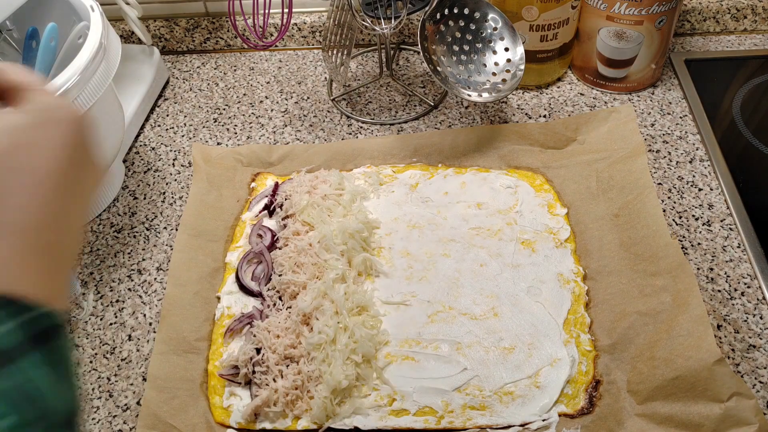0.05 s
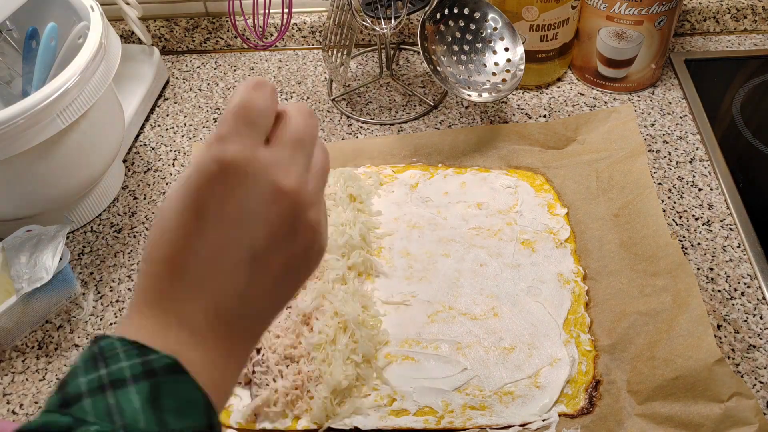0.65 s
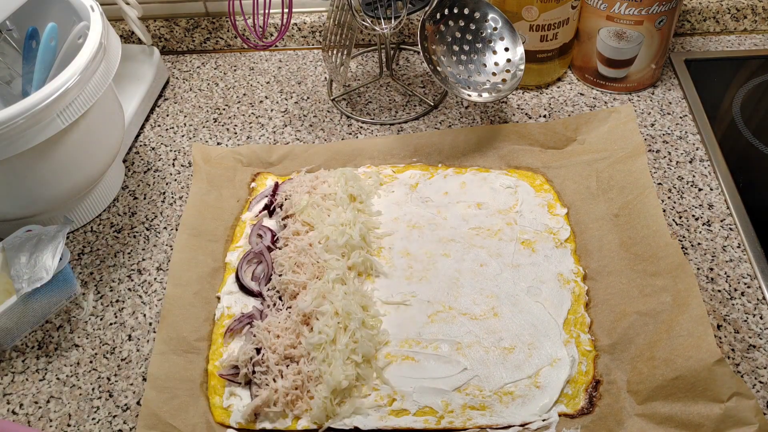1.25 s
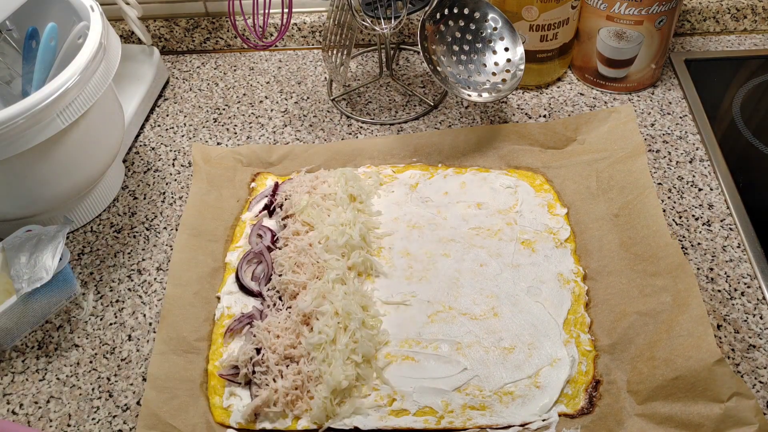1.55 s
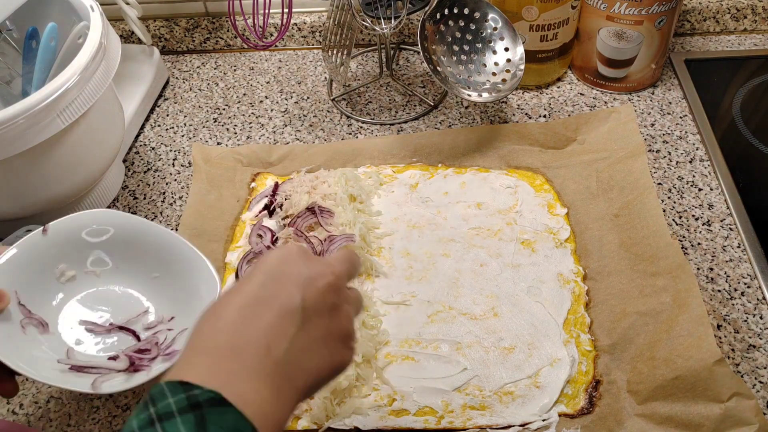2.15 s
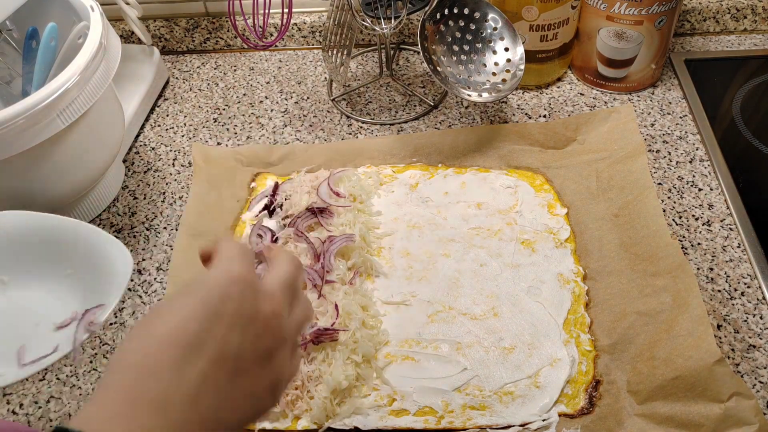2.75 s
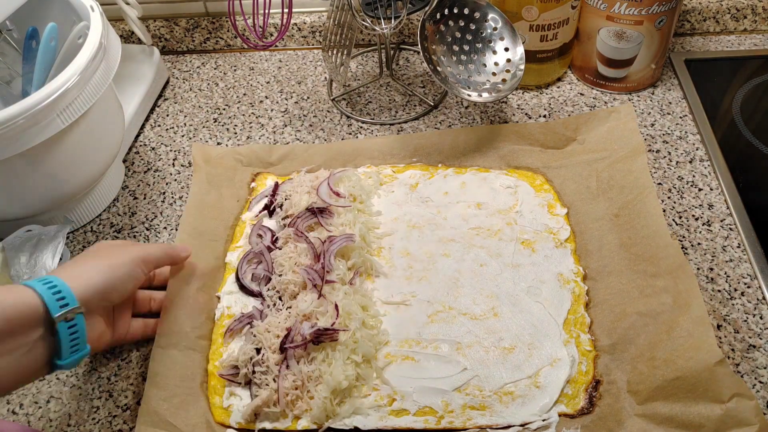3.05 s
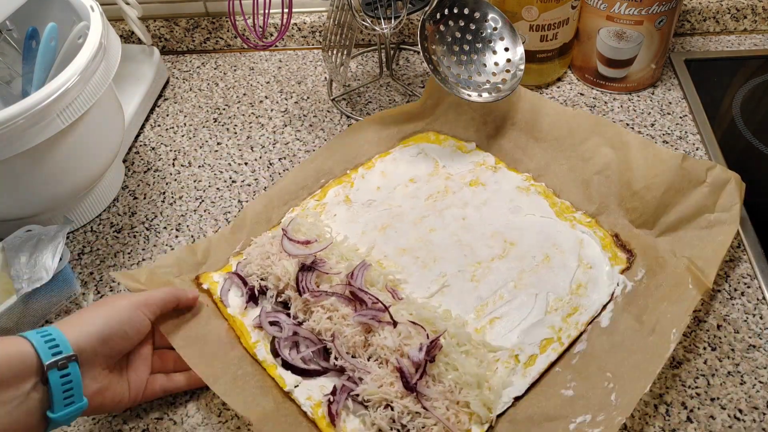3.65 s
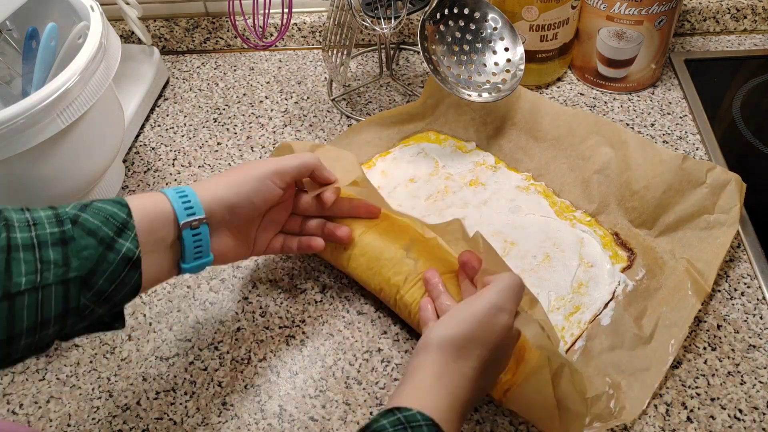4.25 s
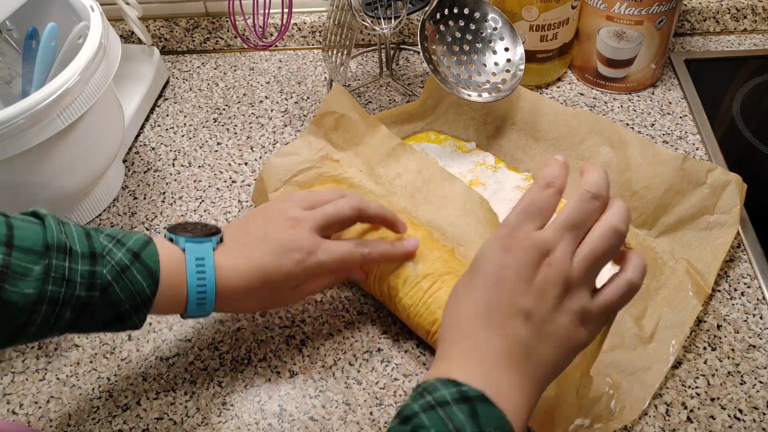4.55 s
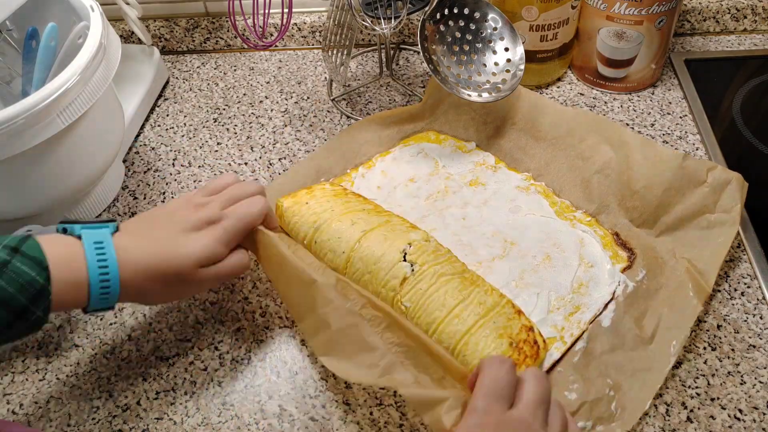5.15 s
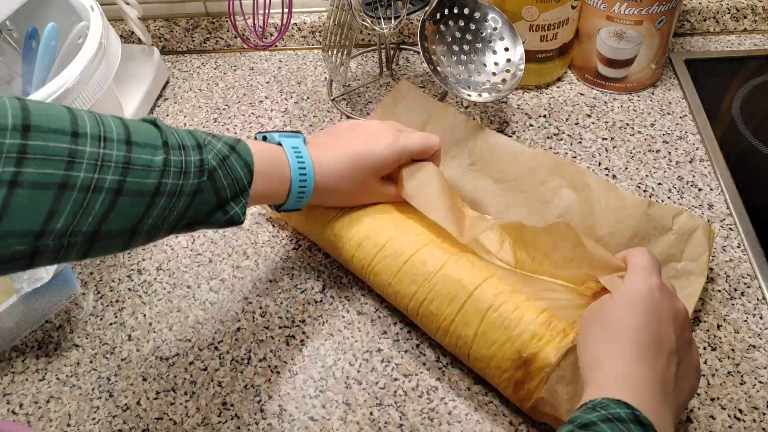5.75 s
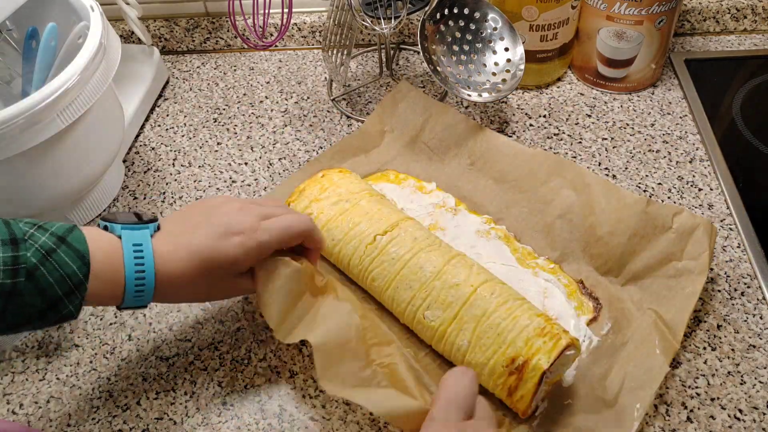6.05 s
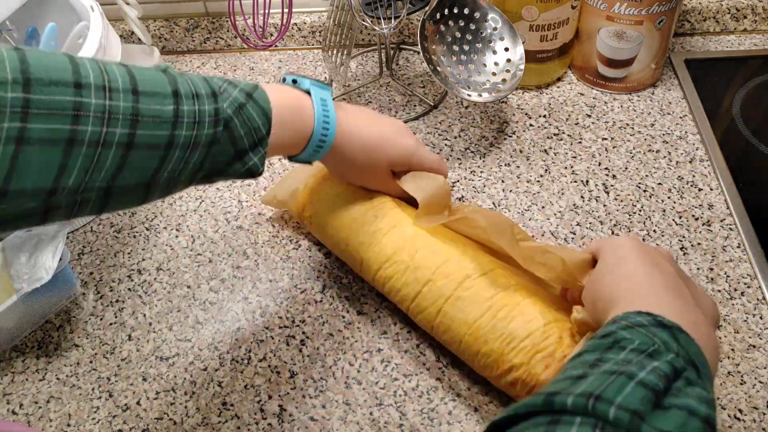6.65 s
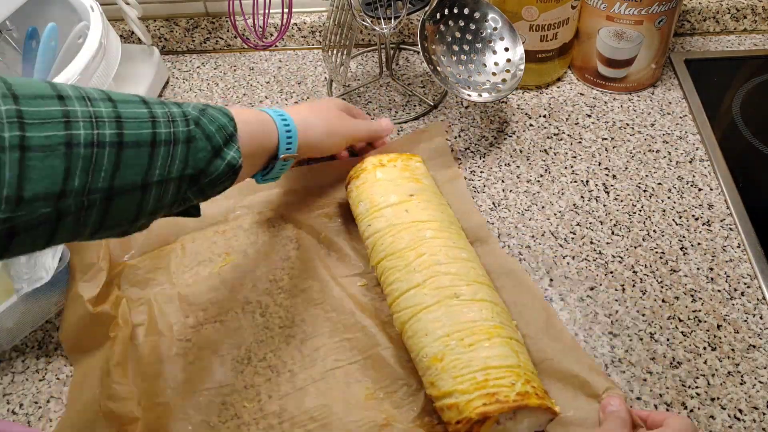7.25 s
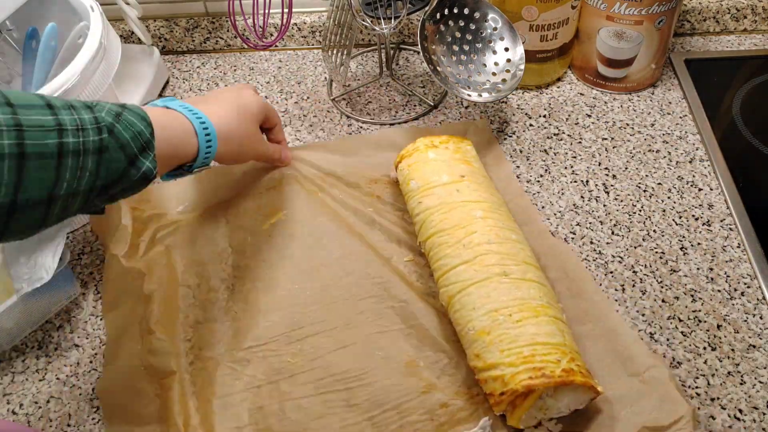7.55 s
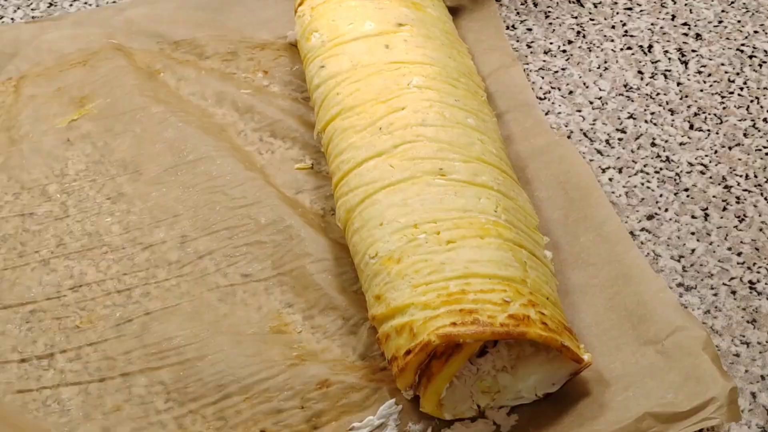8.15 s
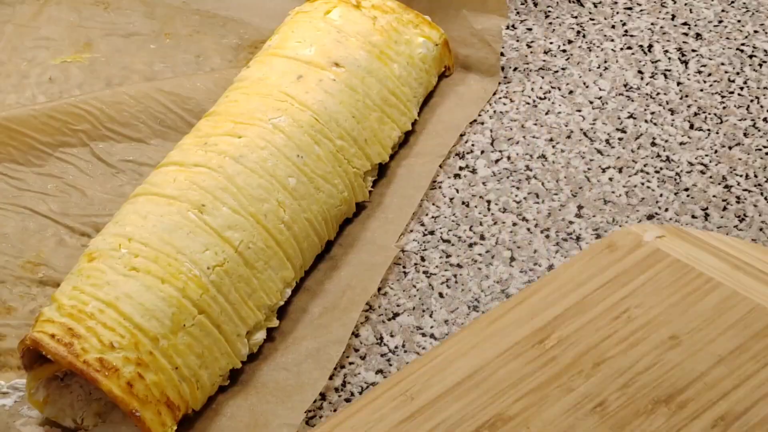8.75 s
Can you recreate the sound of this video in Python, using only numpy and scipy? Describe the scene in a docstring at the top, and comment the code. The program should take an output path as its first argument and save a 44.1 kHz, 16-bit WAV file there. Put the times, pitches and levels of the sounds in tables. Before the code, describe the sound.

After faint ticks and a bowl's dull knock, baking paper rustles and crackles close by, ending in a short rattle of microphone handling.

```python
"""A small, hard kitchen, with a fridge humming under everything. Fingers scatter onion rings from a
china bowl with faint ticks, and the bowl is set down with a dull knock on the counter. A filled sponge
sheet is rolled up in baking paper close to a phone on a stand: the paper slides and crinkles with each
move of the hands, and its creases buckle and snap. The level dips briefly; at last the phone is lifted
and its holder booms and rattles."""
import sys
import numpy as np
from scipy import signal
from scipy.fft import rfft, irfft, next_fast_len
from scipy.io import wavfile
from scipy.ndimage import map_coordinates

SR = 44100
rng = np.random.default_rng(int(sys.argv[2]) if len(sys.argv) > 2 else 0)


def store_wav(level_fs):
    """Save 16-bit WAV to argv[1]."""
    pcm = np.round(np.clip(np.atleast_2d(level_fs), -1, 1) * 32767)
    wavfile.write(sys.argv[1], SR, pcm.T.astype(np.int16))


N = 387638

# Levels are relative within a layer; each layer's own trim comes on top.
# fader moves of the room tone: t/s, hum/dB, motor drone/dB, air/dB
ROOM_FADERS = [(0, -57.5, -71, -67), (1.1, -56.5, -68.5, -66), (1.7, -61, -65, -66), (2.8, -58.5, -63, -63),
               (4.1, -59, -63.5, -61), (5.5, -54.5, -58, -62), (6.7, -56.5, -58, -61),
               (7.85, -53, -59, -61.5), (8.15, -58.5, -66, -64), (8.79, -57, -63, -59)]
# thin tones of the fridge: f/Hz, level/dB
FRIDGE_WHINE = [(522, -79.5), (694, -80.5), (937, -84), (1771, -87), (2929, -94.5)]
# EQ of the motor's burr: f/Hz, level/dB
BURR_EQ = [(20, -17.5), (48, -6), (82, -13.0), (97, -2), (112, -11.0), (150, -24), (500, -58),
           (2000, -100)]
# EQ of the room's air, also used for the hand's rub: f/Hz, level/dB
AIR_EQ = [(130, -11), (240, -10.5), (305, -1), (360, -11), (490, -11.5), (720, -12.5), (1000, -22.5),
          (1300, -24.5), (1750, -23), (2500, -30.5), (3000, -29.5), (4000, -36), (7000, -46),
          (13000, -46.5), (16000, -49.5)]
# stereo width of the air: f/Hz, side over mid/dB
AIR_WIDTH = [(100, -15.5), (500, -8.5), (1000, 1), (4000, 0.5)]
# fingers scatter onion rings: t/s, level/dB, length/s, bowl ring/dB, hardness/(dB per octave)
ONION_TOUCHES = [(1.005, -60.5, 0.018, 0, -11), (1.323, -55, .005, 3.5, 3.5), (1.42, -54, 0.0098, -1, -3),
                 (1.477, -55.5, 0.0076, -24, 2), (1.634, -70.5, .01, 1, 10), (1.793, -74, 0.0054, -3, 8),
                 (2.334, -76, .004, -20, 0), (2.586, -70.5, 0.015, 6.5, -5), (2.751, -68, 0.0044, -24, 0),
                 (2.802, -65, 0.0044, -20, 0)]
# EQ of the onion ticks: f/Hz, level/dB
ONION_EQ = [(800, -30), (2500, 1.5), (5500, 5), (9000, -5), (15000, -15)]
# modes of the china bowl: f/Hz, level/dB, t60/s
BOWL_MODES = [(1714, -4.5, .13), (2680, -2.5, 0.12), (3050, 0, .06), (5500, -11, 0.046), (6300, -3, 0.045),
              (7600, -18, 0.044)]
# blows on the counter: peak t/s, level/dB, rise/s, t60/s, thud f/Hz, thud/dB, scrape/dB, holder boom/dB
COUNTER_HITS = [(1.325, -49, 0.0021, 0.095, 131, 9, -0.5, -10),
                (1.428, -39.5, 0.0083, 0.065, 199.7, -7, 1.5, 2),
                (1.474, -58, 0.0094, 0.048, 192, -8, 5, 9),
                (3.027, -19.5, 0.003, 0.059, 99.2, -0.5, -8, -10),
                (3.126, -42.5, 0.011, 0.067, 101, -13, -10, -10.5)]
# modes of the worktop: f/Hz, level/dB
COUNTER_MODES = [(208, -2.5), (275, -8.5), (433, -0.5), (564, 0), (639, -7.5), (790, -4.5)]
# EQ of a scrape on the worktop: f/Hz, level/dB
SCRAPE_EQ = [(200, -11), (350, -1), (550, -0.5), (750, -7.5), (1000, 3), (1400, 1.5), (2300, -2.5),
             (4000, -13), (7000, -23.5), (15000, -46)]
# bumps that reach the phone's holder: t/s, level/dB, length/s, rattle/dB, thud/dB
HOLDER_BUMPS = [(1.988, -42, 0.012, -35, -22), (2.106, -39, 0.012, -35, -19),
                (2.469, -67.5, 0.033, -16, 19.5), (6.935, -61, 0.012, -10, 18),
                (7.056, -64.5, 0.023, -20, 14), (8.395, -47, 0.0065, -2.5, 5.5),
                (8.438, -40, 0.0024, -10, 7.5), (8.513, -30.5, 0.0031, -4.5, 0.5),
                (8.555, -27.5, 0.006, -7, -6), (8.618, -31, 0.018, -33, -9), (8.641, -29, 0.004, 5.5, -14),
                (8.653, -27.5, 0.0092, 5.5, -9), (8.7, -39.5, 0.027, -10, -24)]
# the hand gripping the holder: t/s, level/dB
GRIP_FADER = [(8.36, -68), (8.38, -50), (8.448, -40.5), (8.474, -73), (8.504, -36.5), (8.654, -27),
              (8.76, -38), (8.79, -35)]
# body resonances of the holder: f/Hz, width/Hz, level/dB
HOLDER_MODES = [(200, 60, -16), (309.5, 25, 1.5), (346.4, 32, -13.5)]
# resonances of its rattle: f/Hz, width/Hz, level/dB
RATTLE_MODES = [(200, 53, -2), (441, 37, 4.5), (577, 41, -4), (770, 96, -1.5), (982, 32, -2),
                (1150, 50, -6), (1310, 41, -6), (1444, 35, -1.5), (1870, 190, -8.5), (2920, 730, -16)]
# hands bend or drag the paper: full-speed t/s, crinkle/dB, rise/s, hold/s, fall/s, flex over crinkle/dB
PAPER_STROKES = [(2.958, -52, 0.017, 0.006, 0.021, -6), (3.021, -31.0, 0.005, 0.038, 0.023, -4.5),
                 (3.139, -35, 0.038, 0.013, 0.018, 0), (3.211, -27.5, 0.0082, 0.012, 0.059, -5),
                 (3.399, -43.5, 0.02, 0.014, 0.049, -11), (3.492, -33.5, 0.076, 0.036, 0.11, -3),
                 (3.684, -51, 0.081, 0.046, 0.049, -8), (3.749, -33, 0.048, 0.005, 0.027, -7),
                 (3.826, -33, 0.074, 0.025, 0.033, -3.5), (3.89, -27.5, 0.034, 0.035, 0.11, -3.5),
                 (4.068, -33, 0.024, 0.022, 0.035, -7), (4.12, -35.5, 0.019, 0.012, 0.02, -8.5),
                 (4.156, -33, 0.02, 0.069, 0.014, -8), (4.258, -33, 0.014, 0.037, 0.011, -10.5),
                 (4.331, -39.5, 0.016, 0.011, 0.026, -2.5), (4.453, -47, 0.089, 0.012, 0.13, -3.5),
                 (4.595, -37, 0.008, 0.025, 0.043, -5.5), (4.653, -33.5, 0.017, 0.074, 0.064, -6.5),
                 (4.811, -37, 0.0065, 0.014, 0.016, -7), (4.888, -69, 0.17, 0.057, 0.06, 9),
                 (5.02, -39.5, 0.024, 0.063, 0.03, -5.5), (5.091, -29.5, 0.026, 0.025, 0.044, -4.5),
                 (5.161, -28, 0.031, 0.041, 0.051, -5), (5.288, -45.5, 0.019, 0.054, 0.12, -4),
                 (5.563, -42.5, 0.05, 0.061, 0.018, 2.5), (5.65, -36.0, 0.016, 0.011, 0.023, -5.5),
                 (5.754, -40.5, 0.087, 0.019, 0.096, -1), (5.84, -37, 0.019, 0.012, 0.024, -6),
                 (5.896, -32.0, 0.033, 0.04, 0.048, -7), (5.971, -40.5, 0.018, 0.037, 0.018, -6),
                 (6.043, -40.5, 0.012, 0.023, 0.03, -8), (6.115, -43.5, 0.087, 0.066, 0.1, -2),
                 (6.426, -45.5, 0.047, 0.04, 0.025, -4), (6.503, -54.5, 0.01, 0.024, 0.02, 3),
                 (6.538, -32.5, 0.0087, 0.171, 0.034, -7.5), (6.764, -36.5, 0.041, 0.021, 0.014, -6.5),
                 (6.809, -38.5, 0.019, 0.04, 0.021, -6.5), (6.881, -43.5, 0.017, 0.006, 0.02, -4),
                 (6.931, -36.5, 0.073, 0.015, 0.043, -10), (7.018, -32.5, 0.061, 0.014, 0.09, -8.5),
                 (7.183, -31, 0.012, 0.038, 0.035, -6), (7.276, -36, 0.019, 0.0074, 0.015, -30),
                 (7.316, -38, 0.0095, 0.025, 0.024, -5.5), (7.384, -36.5, 0.065, 0.054, 0.016, -11.5),
                 (7.522, -29.5, 0.013, 0.016, 0.071, -10.5), (7.587, -43, 0.02, 0.0049, 0.012, -4),
                 (7.641, -55, 0.03, 0.015, 0.018, -20), (7.695, -50, 0.013, 0.0071, 0.014, -35),
                 (8.368, -36.5, 0.017, 0.0067, 0.028, -3.5), (8.407, -33.5, 0.018, 0.018, 0.076, -8),
                 (8.48, -40.5, 0.062, 0.177, 0.012, -8), (8.695, -41.0, 0.01, 0.0044, 0.046, -8),
                 (8.782, -34, 0.019, 0.0096, 0.03, -4.5)]
# bright EQ of the small creases: f/Hz, level/dB
CRINKLE_EQ = [(600, -35.5), (1500, -15.5), (3000, -0.5), (4200, 1), (6000, 1.5), (8500, 0), (10000, -3),
              (12500, -3), (14500, -11), (16000, -21.5)]
# darker EQ of the broad sheet flexing: f/Hz, level/dB
FLEX_EQ = [(100, -22), (300, -12), (600, -14), (1100, -5), (1800, 1.5), (2800, 1), (4500, -2),
           (9000, -26.5)]
# creases that buckle: t/s, level/dB, low-mid share/dB, paper facet f/Hz, left over right/dB
CREASE_SNAPS = [(3.02, -9.5, -1, 1840, -4), (3.2095, -26.5, -5, 3200.0, -1), (3.2975, -23, -11, 8500, 5),
                (3.481, -28, 9.5, 2320, 2), (3.517, -15, 1.5, 2820, -1), (3.5714, -20.5, -9.5, 6400.0, 1),
                (3.679, -31, -11, 5100.0, 5), (3.7471, -13, -2.5, 2320, -4), (3.8423, -10.0, -6, 2320, -2),
                (3.8902, -7.5, -3.5, 8350, -1), (3.917, -11, -6, 7400.0, 4),
                (3.9714, -13.0, -9.5, 7800.0, -3), (4.074, -14, -5, 8400, -2),
                (4.1138, -14.5, -4, 7800.0, 1), (4.2524, -20, -10, 5100.0, 1),
                (4.685, -15.5, 4, 10100.0, -1), (5.091, -16.5, 5.5, 1810, 2), (5.1425, -12, 0.5, 5100.0, 2),
                (5.3968, -28.5, 0.5, 3200.0, -1), (5.476, -14, -9.5, 8800, 7),
                (5.485, -20.5, -9, 8400, 1.5), (5.5617, -10, -8.5, 5800, -1.5), (5.6065, -19, 0, 1760, 0),
                (5.651, -19.5, -4, 7400.0, 4), (5.7674, -13.5, -0.5, 9300, 0.5),
                (5.9338, -22.5, -1, 3700.0, 1), (6.0476, -19, -20, 5250, 2), (6.1674, -28, -1, 1800.0, 0),
                (6.5371, -15.5, -2, 4140, 2.5), (6.6505, -19, -6, 8300.0, -0.5),
                (6.6914, -15.5, -5, 8850, -1), (6.7436, -25, -11, 8300.0, -5.5),
                (6.7673, -15, -1, 6000.0, 0), (6.9276, -22.0, -8, 5500.0, -2),
                (7.0191, -14, -9.5, 7460, 3.5), (7.1885, -10.5, -8.5, 8400, 3),
                (7.25, -22, -11, 5100.0, -3), (7.3267, -15.5, -5, 4600.0, 2),
                (7.4008, -18.5, -7, 7400.0, -6), (7.428, -19, -12, 8300.0, 3),
                (7.5043, -26.0, -0.5, 5100.0, 3.5), (7.5262, -15, -10, 4600.0, 3),
                (7.5457, -15.5, -13, 5100.0, 0), (8.3674, -26.5, 1, 2820, -2),
                (8.392, -18, -10, 8300.0, 10), (8.4166, -15, -9, 4100.0, 2), (8.61, -16.5, -3, 4970, 5)]
# hands press the soft roll through the paper: t/s, level/dB, length/s
ROLL_PRESSES = [(3.1, -44.5, 0.012), (3.92, -48, 0.033), (4.69, -61, 0.032), (5.115, -46.5, 0.013),
                (5.65, -49, 0.0075), (5.74, -53, 0.044), (5.86, -49.5, 0.014), (6.59, -52, 0.036),
                (6.68, -46.5, 0.021), (6.82, -52, 0.022), (7.213, -47.5, 0.0055)]
# muffled EQ of those presses: f/Hz, level/dB
SQUASH_EQ = [(100, -21.5), (220, -10.5), (450, -2.5), (650, 1.5), (900, -5.5), (1600, -14), (5000, -60.5)]
# decay of the kitchen: f/Hz, t60/s
REVERB_DECAY = [(200, 0.33), (2000, 0.11), (7000, 0.083), (15000, 0.023)]
# stereo lean of the action on the counter: f/Hz, left over right/dB
STEREO_LEAN = [(300, 2), (1000, -1.5), (2800, 0.5), (5500, -1.5), (9500, 1.5), (13500, 4.0)]


def amp(db):
    """Decibels to gain."""
    return np.exp(np.asarray(db) * np.log(10) / 20)


def unit(x):
    """x at rms 1."""
    return x / np.sqrt(np.mean(x ** 2) + 1e-20)


def clock():
    """The time of every sample."""
    return np.arange(N) / SR


def along(points, hz):
    """A curve of (f/Hz, value) points, read on a log axis."""
    f, values = np.transpose(points)
    return np.interp(np.log(hz + 1), np.log(f + 1), values)


def faders(rows):
    """A gain curve for each dB column, silent outside the table."""
    times, *columns = np.transpose(rows)
    return [amp(np.interp(clock(), times, db, left=-140, right=-140)) for db in columns]


def swells(rows):
    """Summed bell-shaped envelopes from rows of t/s, level/dB, length/s (one standard deviation)."""
    total, t = np.zeros(N), clock()
    for s, db, length in rows:
        span = slice(round(s * SR) - SR // 6, round(s * SR) + SR // 6)
        total[span] += amp(db) * np.exp(-.5 * ((t[span] - s) / length) ** 2)
    return total


def wobble(rate, size=N):
    """A smooth random curve, rate knots a second."""
    at = np.linspace(0, size * rate / SR, size // 64)
    curve = map_coordinates(rng.standard_normal(int(at[-1]) + 4), [at])
    return np.interp(np.arange(size), np.linspace(0, size, len(at)), curve)


def tone(hz, waver, rate, size=N):
    """A sine of rms 1 whose pitch strays by the share waver, rate times a second."""
    pitch = hz * (1 + waver * wobble(rate, size))
    return np.sqrt(2) * np.sin(2 * np.pi * (rng.random() + np.cumsum(pitch) / SR))


def noise(side_db):
    """White stereo noise of rms 1 with a given width."""
    mid, side = rng.standard_normal((2, N))
    return unit(np.array([mid + amp(side_db) * side, mid - amp(side_db) * side]))


def filtered(x, response):
    """x through a complex frequency response."""
    size = next_fast_len(N + SR // 2)
    return irfft(rfft(x, size) * response(np.fft.rfftfreq(size, 1 / SR)), size)[..., :N]


def eq(x, curve, size=4096):
    """x through a minimum-phase EQ of energy 1."""
    cepstrum = irfft(np.log(amp(along(curve, np.fft.rfftfreq(size, 1 / SR)))))
    cepstrum[1:size // 2] *= 2
    cepstrum[size // 2 + 1:] = 0
    pulse = irfft(np.exp(rfft(cepstrum)))
    return signal.oaconvolve(x, pulse[None] / np.linalg.norm(pulse), axes=1)[:, :N]


def resonant(x, modes):
    """x through a bank of resonators of alternating polarity, at rms 1."""
    def response(f):
        return sum((-1) ** k * amp(db) * 1j * f * width / (hz * hz - f * f + 1j * f * width)
                   for k, (hz, width, db) in enumerate(modes))
    return unit(filtered(x, response))


def crackle(rate, spread_db, clump_db, lag_s=.00011, pan_db=7.0):
    """Tiny clicks that swell in clumps, each with its own stereo lag and pan; rms 1."""
    when, size, sign = rng.random((int(rate * N / SR), 3)).T
    sizes = np.sign(sign - .5) * amp(spread_db * np.minimum(-np.log(1 - size), 5))
    lag, pan = rng.standard_normal((len(when), 2)).T
    channels = []
    for side in (1, -1):
        at = np.clip(np.round(when * N + side * lag * lag_s / 2 * SR), 0, N).astype(int)
        channels.append(np.bincount(at, sizes * amp(side * pan * pan_db / 2), N + 1)[:N])
    return unit(np.array(channels) * amp(clump_db * wobble(90)))


def fridge(hum_hz=47.9, sway_db=0.1):
    """The compressor hums, drones an octave higher with a rough burr, and whines faintly."""
    hum_gain, drone_gain, _ = faders(ROOM_FADERS)
    hum = hum_gain * amp(-sway_db * wobble(4.4)) * tone(hum_hz, 0.018, 9.4)
    drone = amp(-4.5) * drone_gain * tone(2 * hum_hz, 0.0208, 9.3)
    burr = amp(3.0) * drone_gain * eq(noise(side_db=-11), BURR_EQ)
    whine = sum(amp(db) * tone(hz, .002, 12) for hz, db in FRIDGE_WHINE)
    return hum + drone + burr + whine


def room_air():
    """A soft bed of air, narrow in the bass and wide on top."""
    _, _, gain = faders(ROOM_FADERS)
    mid, side = eq(rng.standard_normal((2, N)), AIR_EQ)
    side = filtered(side, lambda hz: amp(along(AIR_WIDTH, hz)))
    return amp(1.32) * gain * np.array([mid + side, mid - side])


def onion_rings(attack_s=0.0023):
    """Moist rings tick off the fingers; soft touches ring the bowl's low modes, hard ones its highs."""
    envelope = swells([row[:3] for row in ONION_TOUCHES])
    ticks = envelope * crackle(rate=2500, spread_db=0.0, clump_db=1.5)
    china, t = np.zeros(N), np.arange(SR // 4) / SR
    for s, db, _, ring_db, hardness in ONION_TOUCHES:
        ring = sum(amp(level + hardness * np.log2(hz / 3000) - 60 * t / t60) * np.sin(2 * np.pi * hz * t)
                   for hz, level, t60 in BOWL_MODES)
        china[round(s * SR):][:len(t)] += amp(db + ring_db) * ring * (1 - np.exp(-t / attack_s))
    return eq(ticks, ONION_EQ) + amp(2) * china


def counter_knocks():
    """Things and hands hit the worktop: its modes, a low thud, a scrape and the holder booming along."""
    body, scrape = np.zeros((2, N))
    t = np.arange(-SR // 10, SR // 3) / SR
    for s, db, rise, t60, thud_hz, thud_db, scrape_db, boom_db in COUNTER_HITS:
        blow = amp(db + np.where(t < 0, -5 * np.abs(t / rise) ** 1.46, -60 * t / t60))
        wood = sum(amp(level - 4) * tone(hz, 0.055, 149, len(t)) for hz, level in COUNTER_MODES)
        thud = amp(thud_db) * tone(thud_hz, 0.2, 119, len(t))
        boom = amp(boom_db) * tone(327, 0.019, 58, len(t))
        start = round((s + t[0]) * SR)
        body[start:start + len(t)] += blow * (wood + thud + boom)
        scrape[start:start + len(t)] += blow * amp(scrape_db)
    return body + amp(4.5) * scrape * eq(noise(side_db=-0.5), SCRAPE_EQ)


def phone_holder(boom_hz=310, thud_hz=100):
    """Bumps and the gripping hand set the holder booming; hard bumps make it rattle."""
    boom = swells([row[:3] for row in HOLDER_BUMPS])
    rattle = swells([(s, db + share, length) for s, db, length, share, _ in HOLDER_BUMPS])
    thud = swells([(s, db + share, length) for s, db, length, _, share in HOLDER_BUMPS])
    grip, = faders(GRIP_FADER)
    rub = amp(-6.5) * resonant(noise(side_db=-20), HOLDER_MODES)
    rub += amp(-13) * eq(noise(side_db=-4.5), AIR_EQ)
    clatter = resonant(noise(side_db=-2.5), RATTLE_MODES)
    clatter = unit(signal.lfilter(*signal.butter(1, 3500, fs=SR), clatter))
    return (boom * tone(boom_hz, 0.015, 45)
            + grip * rub
            + (rattle + amp(-18.5) * grip) * clatter
            + (thud + amp(-20) * grip) * tone(thud_hz, 0.142, 70))


def stroke_gains(flank_db=20):
    """Crinkle and flex gains: a stroke climbs flank_db over its rise, holds, loses it over its fall."""
    crinkle_power, flex_power = np.zeros((2, N))
    t = clock()
    for s, db, rise, hold, fall, flex_db in PAPER_STROKES:
        span = slice(round((s - 4 * rise) * SR), round((s + hold + 4 * fall) * SR))
        away = np.maximum((s - t[span]) / rise, 0) + np.maximum((t[span] - s - hold) / fall, 0)
        gain = amp(db - flank_db * away)
        crinkle_power[span] += gain ** 2
        flex_power[span] += (gain * amp(flex_db)) ** 2
    return np.sqrt([crinkle_power, flex_power])


def shiver(t60, tail_gain):
    """A click, then the brief shaking of the sheet, different left and right."""
    t = np.arange(SR // 30) / SR
    pulse = rng.standard_normal((2, len(t))) * amp(-60 * t / t60)
    pulse *= tail_gain / np.linalg.norm(pulse[0])
    pulse[:, 0] = 1
    return pulse / np.linalg.norm(pulse[0])


def bending(x, depth_db, patch_s):
    """As the sheet bends its resonances wander: random patches of gain over frequency and time."""
    hz, t, spectrum = signal.stft(x, SR, nperseg=384)
    grid = np.meshgrid(np.sqrt(hz / 500) * 4, t / patch_s, indexing="ij")
    gain = amp(depth_db * map_coordinates(rng.standard_normal((60, 3000)), grid, order=1, mode="wrap"))
    gain /= np.sqrt(np.mean(gain ** 2, axis=0))
    return signal.istft(spectrum * gain, SR, nperseg=384)[1][:, :N]


def paper_rustle():
    """Small creases crackle in spurts over the hiss of sliding paper; the broad sheet flexes below."""
    crinkle, flex = stroke_gains()
    fine = crackle(rate=1600, spread_db=1.5, clump_db=4.0)
    fine = signal.oaconvolve(fine, shiver(t60=0.0098, tail_gain=0.75), axes=1)[:, :N]
    fine += amp(-3) * noise(side_db=-1.0)
    spurts = unit(amp(2 * wobble(90)))
    broad = crackle(rate=1500, spread_db=1.0, clump_db=2.5) + amp(-2.5) * noise(side_db=2.0)
    sheet = amp(-2.5) * eq(fine * spurts * crinkle, CRINKLE_EQ) + amp(-1.67) * eq(broad * flex, FLEX_EQ)
    return bending(sheet, depth_db=4.0, patch_s=.012)


def crease_snaps(clicks=8, facet_q=3.5):
    """A crease gives way with one sharp crack and a dying run of smaller ones, ringing its facet."""
    bright, low = np.zeros((2, 2, N + SR))
    for s, db, low_db, facet_hz, pan in CREASE_SNAPS:
        delay, size = rng.exponential(.004, clicks), .45 * rng.standard_normal(clicks)
        delay[0], size[0] = 0, 1  # the leading crack
        run = np.bincount((delay * SR).astype(int), size * np.exp(-delay / .01))
        crack = signal.fftconvolve(run[None], shiver(t60=.012, tail_gain=3), axes=1)
        crack += 1.62 * signal.lfilter(*signal.iirpeak(facet_hz, facet_q, SR), crack)
        crack *= amp(db + np.array([[pan / 2], [-pan / 2]])) / np.linalg.norm(crack)
        span = slice(round(s * SR), round(s * SR) + crack.shape[1])
        bright[:, span] += crack
        low[:, span] += amp(low_db) * crack
    return amp(10.5) * eq(bright[:, :N], CRINKLE_EQ) + amp(9.5) * eq(low[:, :N], FLEX_EQ)


def roll_squash():
    """Paper pressed against the soft roll gives dull puffs of noise."""
    return eq(noise(side_db=-7.0) * swells(ROLL_PRESSES), SQUASH_EQ)


def kitchen_reverb(x):
    """Tiles and cupboards answer with a short tail; the treble dies first."""
    hz, t, spectrum = signal.stft(rng.standard_normal((2, SR // 3)), SR, nperseg=256)
    decay = amp(-60 * t / along(REVERB_DECAY, hz)[:, None])
    tail = signal.istft(spectrum * decay, SR, nperseg=256)[1]
    tail = np.pad(tail / np.linalg.norm(tail[0]), ((0, 0), (SR // 300, 0)))  # pre-delay
    return signal.oaconvolve(x, tail, axes=1)[:, :N]


def scene():
    """The mix: counter action with reverb, leaning left or right by band, plus holder and room tone."""
    action = paper_rustle() + roll_squash() + crease_snaps() + counter_knocks() + onion_rings()
    action += amp(-15.0) * kitchen_reverb(action)
    action = filtered(action, lambda hz: amp(np.outer([.5, -.5], along(STEREO_LEAN, hz))))
    return action + phone_holder() + fridge() + room_air()


def record(dry):
    """The level dips briefly near 8 s, and a steep low-pass takes off the very top."""
    dip_db = np.interp(clock(), [8.028, 8.034, 8.055, 8.085], [0, -36, -24, 0])
    cutoff_hz = 16100
    return filtered(dry * amp(dip_db), lambda hz: 1 / (1 + (hz / cutoff_hz) ** 120))


dry = scene()
out = record(dry)
store_wav(out)
```